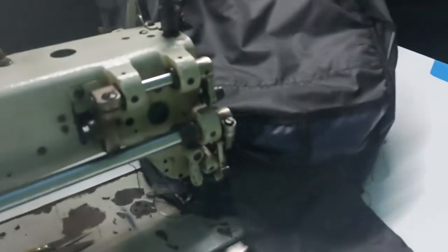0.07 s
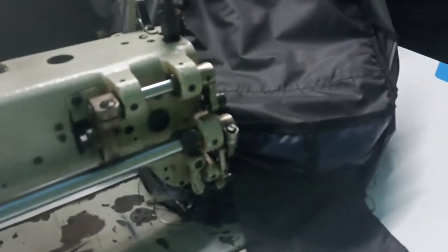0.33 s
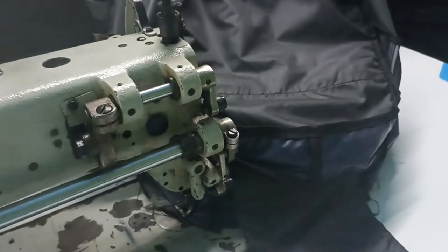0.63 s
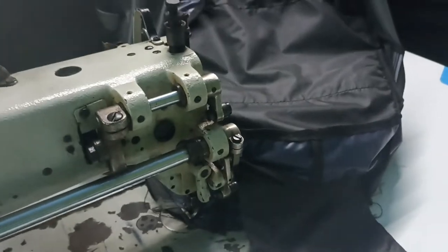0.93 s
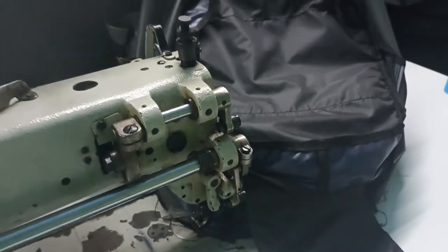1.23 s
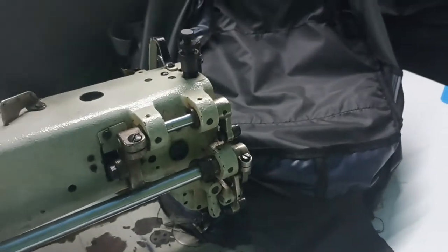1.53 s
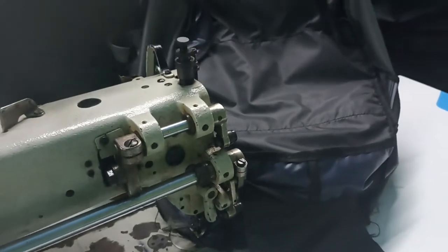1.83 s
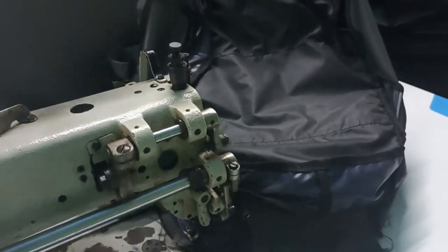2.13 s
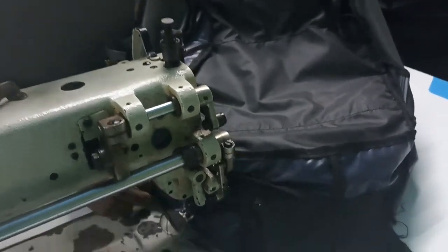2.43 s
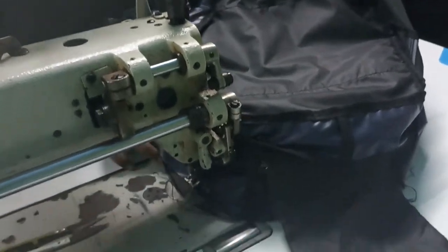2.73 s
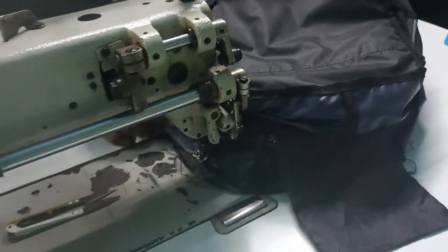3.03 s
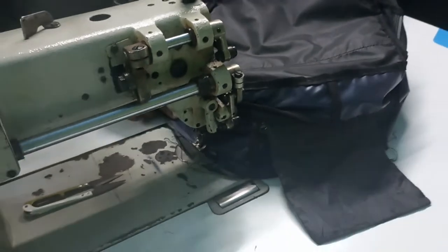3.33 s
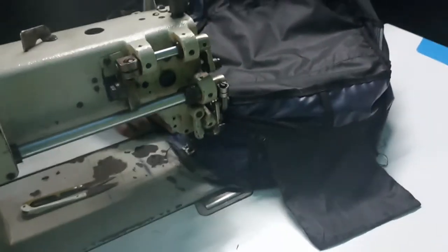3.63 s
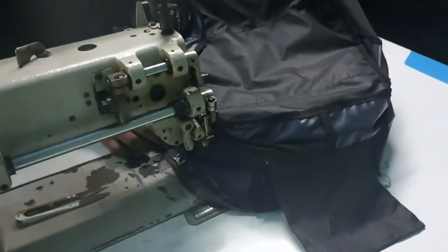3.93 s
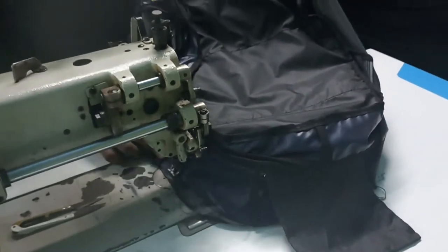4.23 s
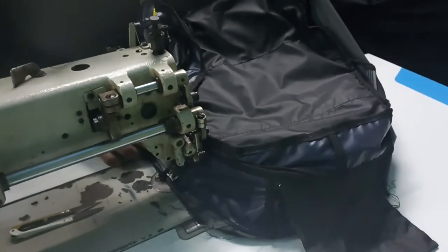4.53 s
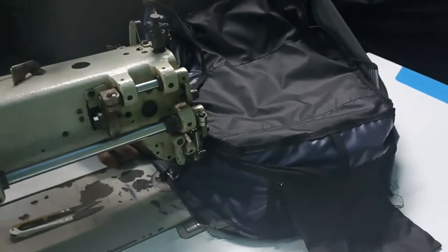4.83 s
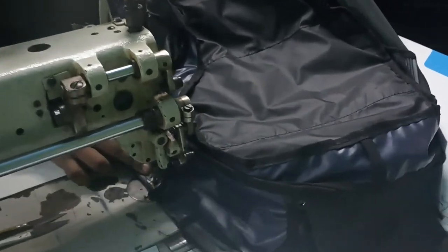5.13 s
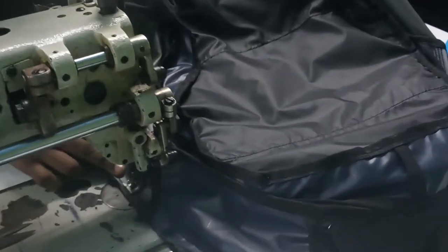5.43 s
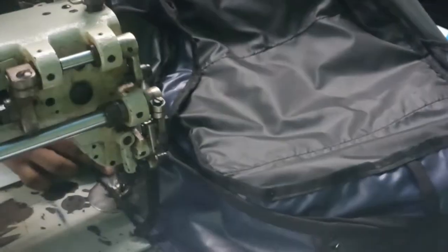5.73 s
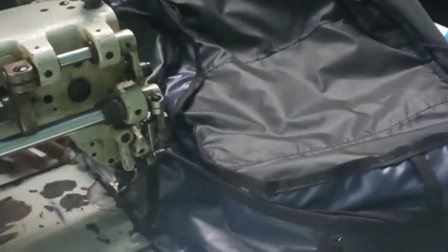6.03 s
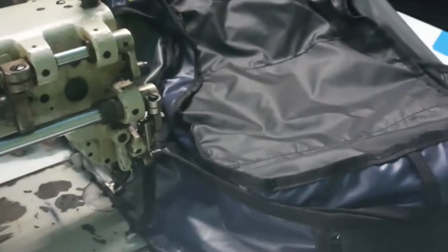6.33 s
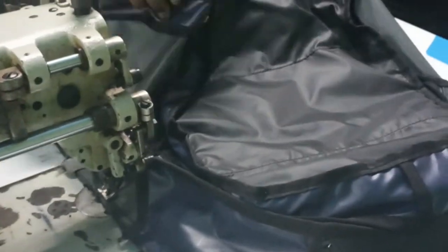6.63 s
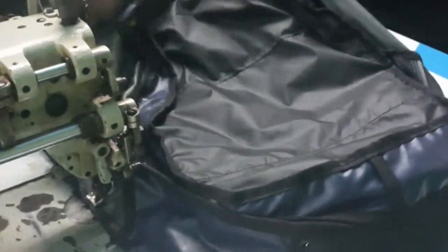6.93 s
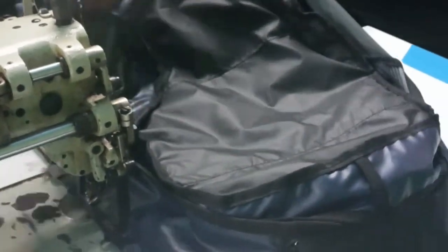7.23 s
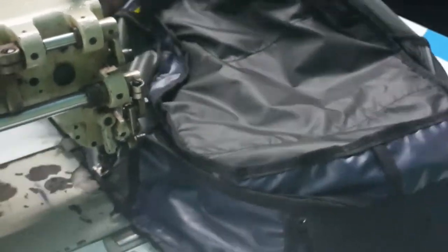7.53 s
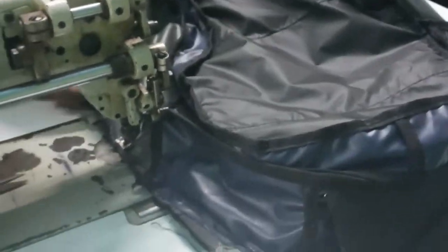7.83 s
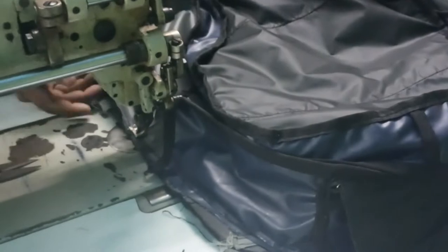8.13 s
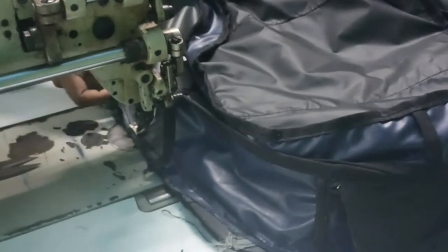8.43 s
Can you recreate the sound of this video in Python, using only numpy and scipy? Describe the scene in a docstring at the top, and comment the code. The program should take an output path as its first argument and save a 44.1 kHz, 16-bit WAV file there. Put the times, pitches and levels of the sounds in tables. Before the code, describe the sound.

In a workshop with a steady rush of motors and fans, stiff cloth rustles and things knock on benches. Close to the microphone, a heavy industrial sewing machine groans, then clunks into four short runs of thumping, rattling stitches, the needle snapping through thick seams. A lighter, faster machine further away joins briefly in the middle, then whirrs alone in a softer, longer run at the end.

```python
"""A workshop, the microphone close to a heavy industrial sewing machine. Over the rush of motors and fans,
thick cloth rustles and things knock on the benches. The clutch slips and groans, then clunks in for four
short runs: the shaft spins up, overshoots, settles and coasts, and shake, thumps and clatter follow its
speed. Seams boom on the table and the needle snaps through them. From the end of the second run a lighter,
faster machine whirrs on and off further away; it has the last run to itself."""
import sys
import numpy as np
from scipy import signal
from scipy.fft import rfft, irfft, next_fast_len
from scipy.io import wavfile
from scipy.ndimage import uniform_filter1d

SR = 44100
rng = np.random.default_rng(int(sys.argv[2]) if len(sys.argv) > 2 else 0)


def transcribe(u):
    """Save the signal u as a 16-bit wav file named by the first command-line argument.

    u: samples, shape (n,) or (channels, n), limited to [-1, 1]; the rate is SR.
    q: integer samples, one column per channel.
    """
    v = np.clip(np.atleast_2d(u).T, -1, 1)
    q = np.round(v * 32767).astype(np.int16)
    wavfile.write(sys.argv[1], SR, q)


N = 373527
TIME = np.arange(N) / SR
STITCH_HZ, OVERSHOOT_HZ = 31.1, 3.4  # the near shaft's working speed, and how far it races past it

# Runs of the near machine. Each row: clutch in, pedal released and coasting time in seconds, clunk level
# in dB, needle reaches the cloth in seconds, then levels of shake, thumps, clatter and ticking in dB.
RUNS = [(1.842, 2.38, .13, -18.5, 2.07, -20.5, -24, -22.5, -27),
        (3.408, 3.965, 0.15, -18.5, 3.5, -20.5, -22.5, -22.5, -26.5),
        (4.153, 4.477, .16, -15, 4.25, -24, -22.5, -22, -27.5),
        (4.803, 5.745, .225, -18.5, 4.87, -20, -23, -22, -26)]
# The shaft creeping before the first run. Each row: time in seconds, stitches per second.
CREEP = [(1.665, 13.8), (1.8, 19.5), (1.93, 20.5)]
# Colour of the near machine's casting. Each row: frequency in Hz, level in dB.
CASTING = [(410, -21.5), (700, 0.5), (1040, -4.5), (1260, 0), (1540, -2), (2020, 3), (2630, 4.5),
           (3740, -4), (4260, -7), (5190, -8.5), (6570, -8), (8530, -15.5), (12000, -8.5), (15200, -12),
           (16000, -33)]
# Its ringing steel parts. Each row: frequency in Hz, width in Hz, lift in dB.
STEEL = [(2330, 170, 2), (2710, 130, -0.5), (4240, 110, 1.5), (6080, 130, 1.5), (6600, 200, 0.5),
         (11880, 180, 3), (13100, 200, -7)]


def undb(db):
    """Decibels to gain."""
    return 10 ** (np.asarray(db) / 20)


def unit(x):
    """Scale so that the mean of the channels has rms 1."""
    return x / np.sqrt(np.mean(np.atleast_2d(x).mean(0) ** 2))


def walk(rate_hz):
    """A wandering value: random levels joined by straight lines."""
    knots = rng.standard_normal(4000)
    return 0.82 * np.interp(TIME * rate_hz, np.arange(len(knots)), knots)


def shape(points, hz):
    """Read (Hz, dB) points on a log-frequency axis."""
    point_hz, point_db = np.transpose(points)
    return np.interp(np.log(hz), np.log(point_hz), point_db)


def cut(x, hz, kind):
    """Gentle low- or high-pass."""
    return signal.sosfilt(signal.butter(2, hz, kind, fs=SR, output="sos"), x)


def convolve(x, response):
    """Let a signal ring through a response."""
    return signal.oaconvolve(np.atleast_2d(x), response, axes=-1)[:, :N]


def at_microphone(pair, colour, rings=(), left_db=0, alike_hz=1100, lag_ms=.24):
    """Colour two unrelated signals and catch them at two ports: alike in the bass, the right one late."""
    # Balance of the microphone's ports. Each row: frequency in Hz, left minus right in dB.
    port_balance = [(300, 0.7), (900, 1.5), (2000, -1.5), (3200, -3.5), (4500, -4), (6700, -12.5),
                    (8200, -6), (9800, 3.5), (11700, 7), (13500, 3), (15500, -6)]
    size = next_fast_len(N + 2000)
    hz = np.maximum(np.fft.rfftfreq(size, 1 / SR), 1)
    lift_db = sum(lift / (1 + ((hz - centre) / (width / 2)) ** 2) for centre, width, lift in rings)
    one, other = rfft(pair, size)
    alike = 1 / (1 + (hz / alike_hz) ** 2)
    mid, side = one * np.sqrt(1 + alike), other * np.sqrt(1 - alike)
    tilt = undb((shape(port_balance, hz) + left_db) / 2)
    left = (mid + side) * tilt
    right = (mid - side) / tilt * np.exp(-2j * np.pi * hz * lag_ms / 1000)
    ports = np.array([left, right]) / np.hypot(tilt, 1 / tilt)
    return unit(irfft(ports * undb(shape(colour, hz) + lift_db), size)[:, :N])


def noise(colour, rings=(), left_db=0):
    """Coloured noise at the microphone."""
    return at_microphone(rng.standard_normal((2, N)), colour, rings, left_db)


def burst(t60):
    """Dense ringing: two channels of dying noise with unit energy."""
    t = TIME[:SR // 2]
    ring = rng.standard_normal((2, len(t))) * undb(-60 * t / t60)
    return ring / np.sqrt(np.sum(ring ** 2) / 2)


def fades(times, dbs, t60s, rise_s=0.00058):
    """Envelope of quick starts that die away."""
    envelope = np.zeros(N)
    for start, db, t60 in np.broadcast(times, dbs, t60s):
        part = envelope[int(start * SR):][:SR // 2]
        t = TIME[:len(part)]
        part += undb(db - 60 * t / t60) * (1 - np.exp(-t / rise_s))
    return envelope


def speed_curve(points):
    """Shaft speed through (seconds, Hz) points, at rest outside them."""
    return np.interp(TIME, *np.transpose(points), left=0, right=0)


def workshop(level_db=-40, flutter_db=1.86):
    """Idling motors and fans around the room blend into a slightly restless rush."""
    # Colour of the room tone. Each row: frequency in Hz, level in dB.
    room_tone = [(15, -69), (25, -48), (117, -3), (185, -2.5), (217, -4), (256, -4.5), (309, -2.5),
                 (489, -7.5), (1040, -10.5), (1330, -10.5), (2610, -12), (5000, -27.5), (9840, -37),
                 (12200, -34), (16000, -40)]
    rush = noise(room_tone, rings=[(2170, 180, 0.99), (6500, 980, 6.9), (11900, 200, 5)], left_db=-1.5)
    return rush * undb(level_db + flutter_db * walk(35))


def cloth_rustle(crinkle_db=3):
    """Stiff cloth crinkles as it is guided by hand."""
    # Shifts of the cloth. Each row: start in seconds, level in dB, t60 in seconds.
    rustles = [(.025, -47.5, 0.76), (.39, -48.5, 0.28), (.53, -46, .14), (1.11, -43, 0.26),
               (1.545, -45, 0.48), (2.635, -41.5, 0.082), (3.335, -47, 0.54), (6.54, -49, 0.37)]
    # Colour of the cloth. Each row: frequency in Hz, level in dB.
    cloth = [(1500, -8), (4000, -3), (7000, -1), (9000, -8), (12000, 2), (16000, -10)]
    crinkle = noise(cloth) * undb(crinkle_db * walk(400))
    return fades(*np.transpose(rustles), rise_s=0.0044) * crinkle


def knocks():
    """Levers and things handled on the benches, and short metallic chirps as the machine starts up: each knock
    mixes thud, clack, clink and tick."""
    # Each row: start in seconds, levels of thud, clack, clink and tick in dB, t60 in seconds.
    bench_knocks = [(0.331, -28.5, -48, -60, -65, 0.14), (1.14, -27, -37, -55, -55, 0.08),
                    (1.591, -35, -33.5, -52, -45.5, 0.36), (1.946, -45, -47, -43, -25, 0.26),
                    (2.858, -54, -43, -39, -62, 0.28), (2.978, -45, -36, -40, -66, 0.33),
                    (3.47, -50, -45, -45, -30.5, 0.18), (6.32, -44, -39.5, -41, -44.5, 0.29),
                    (6.466, -48, -49, -55, -37.5, 0.13)]
    # Colours of the four parts; the clink is small steel tools. Each row: frequency in Hz, level in dB.
    thud = [(60, -26), (150, 12.5), (350, 7), (550, 1), (1000, -9), (4000, -60)]
    clack = [(400, -25), (720, -3), (890, 5), (1150, -11), (1900, -9), (2350, -4), (2700, -9), (3400, -10),
             (5000, -27), (10000, -42)]
    clink = [(1500, -45), (2080, -6), (2190, -11), (2300, 0), (2390, -10), (2470, -2), (2700, -20),
             (3100, -15), (5000, -50)]
    tick = [(3000, -26), (5800, 3), (6600, 10), (7300, -9), (12000, -7), (16000, -35)]
    times, *levels, t60s = np.transpose(bench_knocks)
    colours = thud, clack, clink, tick
    return sum(fades(times, dbs, t60s) * noise(colour) for dbs, colour in zip(levels, colours))


def slipping_clutch(groan_db=-22, growth=1.6):
    """The half-engaged clutch rubs and groans, louder as the shaft gathers speed."""
    # Colour of the groan. Each row: frequency in Hz, level in dB.
    groan = [(50, -34), (120, 7), (250, -2), (380, 7), (560, -22), (1000, -19), (4000, -60)]
    pace = np.abs(uniform_filter1d(speed_curve(CREEP) / STITCH_HZ, size=900))
    return undb(groan_db) * pace ** growth * noise(groan)


def shaft_speed(start, release, coast_s, jerk_hz=14, spin_up_s=0.135, settle_s=0.165):
    """One run: the clutch jerks the shaft and grips ever harder; it overshoots, settles and coasts."""
    age = TIME - start
    grip = np.clip(age / spin_up_s, 0, 1) ** 1.5
    spin_up = (age > 0) * (jerk_hz + grip * (STITCH_HZ + OVERSHOOT_HZ - jerk_hz))
    since_peak = np.maximum(age - spin_up_s, 0)
    settling = OVERSHOOT_HZ * (1 - np.exp(-(since_peak / settle_s) ** 2))
    coasting = np.exp(-(np.maximum(TIME - release, 0) / coast_s) ** 2)
    return (spin_up - settling) * coasting


def hum(turns, orders, waver_db):
    """Unbalanced parts hum at multiples of the shaft rate; each line wavers in level."""
    return unit(sum(undb(db + waver_db * walk(11)) * np.sin(2 * np.pi * (order * turns + rng.random()))
                    for order, db in orders))


def blows(turns, jitter_s, scatter_db, t60, loose, contact_s, strike_hz=22):
    """Each linkage strikes once a turn with its own ring; loose parts rattle differently every time."""
    # Blows within one shaft turn. Each row: place as a share of the turn, level in dB.
    strokes = [(.03, 2), (.2, -3), (.38, 2.5), (.53, -2), (.7, -4), (.88, -4.5)]
    t = TIME[:SR // 8]
    contact = 1 - np.exp(-t / contact_s)
    rung, power = 0, np.zeros(N)
    for place, db in strokes:
        timing, force = rng.standard_normal((500, 2)).T
        times = np.interp(np.arange(len(timing)) + place, turns, TIME, right=np.inf) + jitter_s * timing
        inside = (times > 0) & (times < TIME[-1])
        hits = np.zeros(N)
        hits[(times[inside] * SR).astype(int)] = undb(db + scatter_db * np.clip(force[inside], -2, 2))
        rung = rung + convolve(hits, burst(t60)[:, :len(t)] * contact)
        power += hits ** 2
    fading = undb(-60 * t / t60) * contact
    rattle = np.sqrt(np.abs(convolve(power, fading[None] ** 2))) * rng.standard_normal((2, N))
    impacts = np.sqrt(1 - loose) * unit(rung) + np.sqrt(loose) * unit(rattle)
    speed = np.gradient(turns) * SR
    struck = impacts * np.sqrt(speed.mean() / speed)  # even power however fast the blows come
    # slow linkages only slide and rub; striking takes over as the shaft speeds up
    rubbing = unit(rng.standard_normal((2, N)))
    striking = 1 / (1 + (strike_hz / speed) ** 6)
    return np.sqrt(striking) * struck + np.sqrt(1 - striking) * rubbing


def table_shake(turns, speed, resonant_hz=31.9, width_hz=1.62, build_s=0.15, sway_db=-5.5, calm_db=-5):
    """The table shakes with the shaft; near one speed the stand sways in sympathy and it shakes harder."""
    # Lines of the shake. Each row: multiple of the shaft rate, level in dB.
    shake_orders = [(2, -24.5), (5, -23), (6, -1), (7, -11), (8, -10), (11, -15.5), (12, -10.5), (13, -24),
                    (14, -9.5), (16, -22), (17, -2.5), (18, -8.5), (19, -16.5), (21, -16), (22, -19),
                    (25, -13.5)]
    resonance = 1 / np.sqrt(1 + ((speed - resonant_hz) / width_hz) ** 4)
    # the sway builds slowly but falls at once
    hold = np.exp(-1 / (build_s * SR))
    sympathy = np.minimum(resonance, signal.lfilter([1 - hold], [1, -hold], resonance))
    sway = undb(sway_db) * sympathy * hum(turns, orders=[(3, 0)], waver_db=1.8)
    return sway + undb(calm_db * (1 - sympathy)) * hum(turns, shake_orders, waver_db=2.0)


def table_thumps(turns):
    """The blows of the linkages thump through the table top."""
    # Colour of the table. Each row: frequency in Hz, level in dB.
    table_colour = [(25, -55), (45, -38), (70, -13), (110, -3.5), (165, 1.5), (300, -2), (420, 0.5),
                    (560, -2), (720, -5.5), (1000, -5.5), (2000, -9), (6000, -50)]
    # Resonances of its top. Each row: frequency in Hz, width in Hz, lift in dB.
    table_rings = [(166.5, 10.4, 9.5), (206, 14, 4), (270, 14, 2), (390, 40, 7.5), (442, 6.3, 5),
                   (535.4, 31, 9.5)]
    thuds = blows(turns, jitter_s=0.00035, scatter_db=1.0, t60=0.035, loose=0.29, contact_s=0.00061)
    return at_microphone(thuds, table_colour, table_rings)


def linkage_clatter(turns, top_hz=5000, ringing_db=-2):
    """Heavy linkages clatter in the middle range and set loose steel parts singing on and off."""
    # The loose parts. Each row: frequency in Hz, width in Hz, level in dB.
    loose_parts = [(2763, 51, -2.5), (3070, 94, -12), (3390, 180, -3), (4120, 260, -1), (4170, 140, -5)]
    strikes = blows(turns, jitter_s=.0004, scatter_db=1.6, t60=0.03, loose=0.22, contact_s=0.00095)
    clatter = at_microphone(strikes, CASTING, STEEL, left_db=1.4)
    ringing = 0
    for hz, width, db in loose_parts:
        part = signal.lfilter(*signal.iirpeak(hz, hz / width, fs=SR), clatter)
        ringing += undb(db + 6.9 * walk(18)) * part
    return unit(cut(clatter, top_hz, "low") + undb(ringing_db) * ringing)


def hook_ticking(turns, speed, idle, bottom_hz=5000, overshoot_db=3, idle_db=-1.5):
    """The light hook and needle tick: softer until they reach the cloth, hardest in the overshoot."""
    strikes = blows(turns, jitter_s=.0005, scatter_db=2.3, t60=0.048, loose=0.91, contact_s=0.0006)
    ticks = at_microphone(strikes, CASTING, STEEL, left_db=2.5)
    racing = np.maximum(speed - STITCH_HZ, 0) / OVERSHOOT_HZ
    return undb(overshoot_db * racing + idle_db * idle) * unit(cut(ticks, bottom_hz, "high"))


def near_machine():
    """Close up: shake, thumps, clatter and ticking, locked to one shaft and growing with its speed."""
    run_speeds = np.array([shaft_speed(*run[:3]) for run in RUNS])
    speed = np.maximum(run_speeds.max(0), speed_curve(CREEP))
    turns = np.cumsum(np.maximum(speed, 1)) / SR
    current_run = run_speeds.argmax(0)
    in_cloth_s, shake_db, thump_db, clatter_db, tick_db = np.array(RUNS)[current_run, 4:].T
    pace = np.minimum(speed / STITCH_HZ, 1)
    shake = undb(shake_db) * pace ** 4 * table_shake(turns, speed)
    thumps = undb(thump_db) * pace ** 1.82 * table_thumps(turns)
    clatter = undb(clatter_db) * pace ** 2.82 * linkage_clatter(turns)
    ticking = undb(tick_db) * pace ** 2.7 * hook_ticking(turns, speed, idle=TIME < in_cloth_s)
    return shake + thumps + clatter + ticking


def seam_booms(t60=0.13):
    """The thick seam lurches under the foot and booms on the table."""
    # The lurches. Each row: start in seconds, level in dB.
    lurches = [(1.841, -26), (1.875, -13.5), (2.04, -12.5), (2.075, -16), (2.118, -15), (3.56, -17.5),
               (4.219, -28), (4.98, -18), (5.817, -29), (5.865, -17.5)]
    # Colour of the boom. Each row: frequency in Hz, level in dB.
    boom = [(40, -50), (75, -32), (108, -7), (130, -4), (165, -13), (230, -11), (400, -7), (800, -55),
            (2000, -59)]
    return fades(*np.transpose(lurches), t60, rise_s=.006) * noise(boom)


def clutch_clunks(body_db=-5, crack_db=-11, crack_t60=0.2, bite_s=0.0058):
    """The clutch bites at the start of each run: the table rings low and the linkage chatters."""
    # Modes of the clunk. Each row: frequency in Hz, level in dB, t60 in seconds.
    clunk_modes = [(102, -0.5, 0.086), (172, -7, 0.15), (207, -14, 0.088), (340, -10, 0.15),
                   (422, 3.5, 0.057), (490, -10, 0.061), (480, -3, 0.088), (616, -37, 0.017)]
    times, _, _, dbs, *_ = np.transpose(RUNS)
    t = TIME[:SR // 3]
    ring = sum(undb(db - 60 * t / t60) * np.sin(2 * np.pi * (hz * t + rng.random()))
               for hz, db, t60 in clunk_modes)
    ring *= 1 - np.exp(-t / bite_s)
    # trim the deepest bass so the clunk stays tight
    ring = cut(cut(ring, 100, "high"), 100, "high")
    hits = np.zeros(N)
    hits[(times * SR).astype(int)] = undb(dbs + body_db)
    body = convolve(hits, ring[None] / ring[:SR // 100].std())
    crack = fades(times, dbs + crack_db, crack_t60, rise_s=0.00034) * noise(CASTING, STEEL)
    return body + crack


def needle_snaps(snap_db=-3, t60=0.02, gap_s=.033):
    """The needle punches the thickest layers, about once a stitch, and jars the steel."""
    # Thick places. Each row: first snap in seconds, length in seconds, relative level in dB.
    seams = [(1.970, .02, -24), (2.015, .02, -8), (2.035, .11, -13), (2.407, .02, -11), (3.765, .21, -14),
             (4.003, .02, -11), (4.218, .02, -8.5), (5.82, .02, -6.5)]
    # Colour of a snap. Each row: frequency in Hz, level in dB.
    bite = [(400, -8), (1000, -4), (2000, 0), (3000, 4), (4300, -0.5), (6500, -6), (8500, -11),
            (13000, -10), (16000, -22)]
    jolts = sum(fades(start + np.arange(0, length, gap_s), db + snap_db, t60, rise_s=0.00096)
                for start, length, db in seams)
    return jolts * noise(bite, STEEL)


def far_machine(top_speed_hz=59.2, shake_db=-32, drone_db=-33.5, whirr_db=-29):
    """Further off, a faster machine whose strokes the room smears to a whirr, louder as it speeds up."""
    # One speed curve for each spell of work. Each point: time in seconds, stitches per second.
    spells = [
        [(3.9, 21), (4.05, 42), (4.73, 43), (4.82, 20)],
        [(6.3, 17), (6.52, 26.6), (6.74, 30), (6.78, 42.9), (7.33, 45.8), (7.48, 59.2), (8.25, 56.7),
         (8.45, 13.5)],
    ]
    # Its hum and the whine of belt-driven parts. Each row: multiple of the shaft rate, level in dB.
    shake_orders = [(3, 0), (3.637, -3), (4.365, -11), (6.365, -8), (7, -6), (9, -11), (17, -16),
                    (19.54, -17), (35.9, -9)]
    # Colours of its table and of its whirr. Each row: frequency in Hz, level in dB.
    table_colour = [(50, -32), (100, -18), (165, -1.5), (215, -3), (290, -9), (400, -2.5), (520, -4.5),
                    (750, -9.5), (1100, -21.5), (2000, -43)]
    whirr_colour = [(410, -44), (700, -18), (1210, -7.5), (1640, -2), (1970, -4.5), (2160, -3.5), (2400, 0),
                    (3790, -11), (6650, -9.5), (7200, -13), (9600, -20), (10900, -21), (12300, -16),
                    (14800, -10), (16000, -23)]
    # Its ringing steel. Each row: frequency in Hz, width in Hz, lift in dB.
    steel_rings = [(2104, 46, 10), (2208, 73, 6.8), (2760, 28, 0.86), (6550, 220, 3), (11800, 300, 8.5),
                   (12737, 470, 5.65)]
    speed = sum(speed_curve(spell) for spell in spells)
    pace = speed / top_speed_hz
    turns = np.cumsum(np.maximum(speed, 1)) / SR
    strikes = blows(turns, jitter_s=.0005, scatter_db=1, t60=0.076, loose=0.63, contact_s=0.001)
    shake = undb(shake_db) * pace ** 7.64 * hum(turns, shake_orders, waver_db=1.5)
    drone = undb(drone_db) * pace ** 1.64 * at_microphone(strikes, table_colour, left_db=1)
    whirr = undb(whirr_db) * pace ** 2.75 * at_microphone(strikes, whirr_colour, steel_rings, left_db=-3)
    return shake + drone + whirr


def scene(echo_db=-11, room_t60=0.35):
    """The close sounds with their short echo off the walls; behind them the far machine and room tone."""
    near = near_machine() + slipping_clutch() + clutch_clunks() + needle_snaps()
    near += cloth_rustle() + seam_booms() + knocks()
    walls = cut(burst(room_t60) * (TIME[:SR // 2] > .006), 305, "high")
    return near + undb(echo_db) * convolve(near, walls) + far_machine() + workshop()


def record(dry, top_hz=16000):
    """The recorder rounds the tallest peaks and cuts the top."""
    return signal.sosfilt(signal.ellip(10, .2, 70, top_hz, fs=SR, output="sos"), np.tanh(dry))


dry = scene()
out = record(dry)
transcribe(out)
```